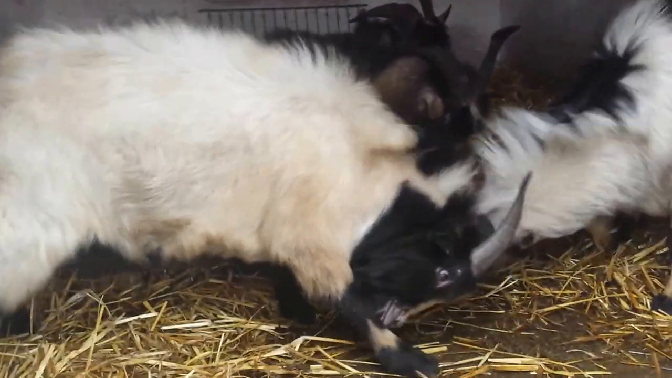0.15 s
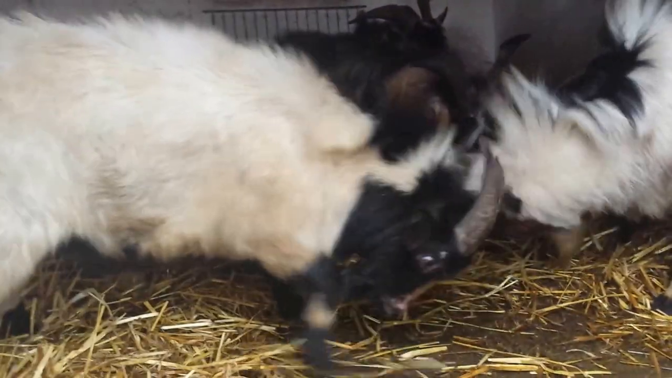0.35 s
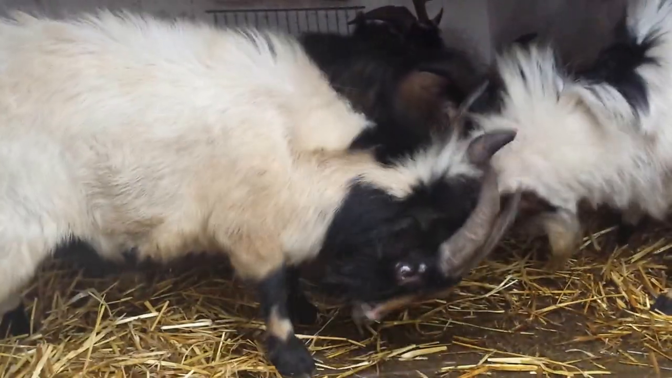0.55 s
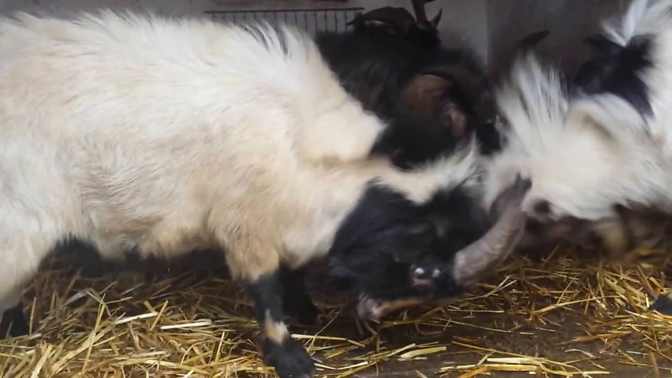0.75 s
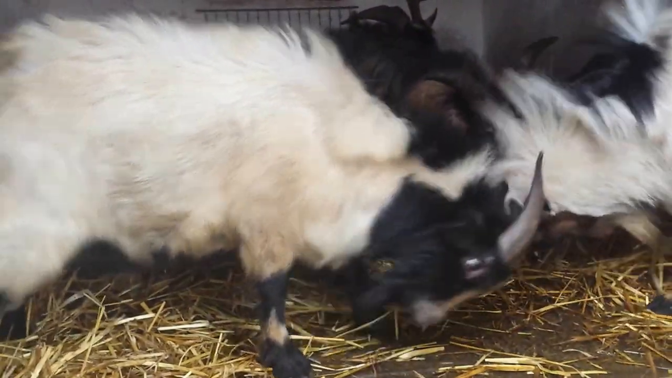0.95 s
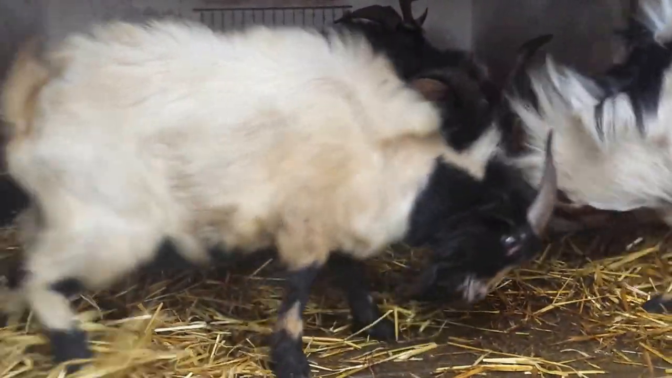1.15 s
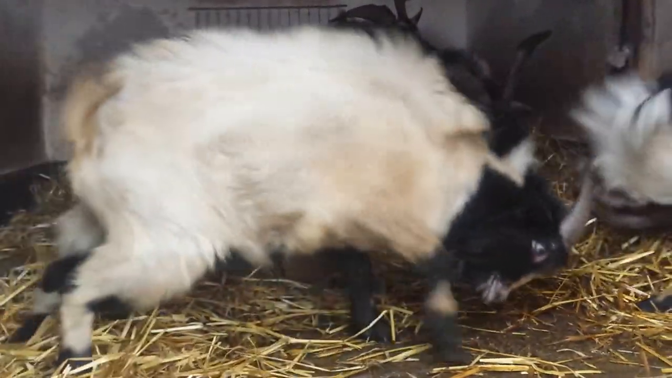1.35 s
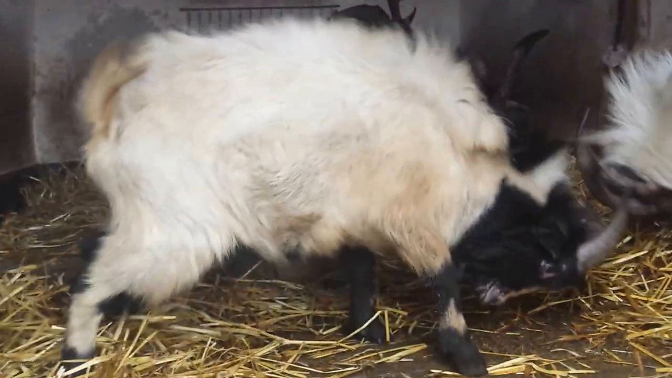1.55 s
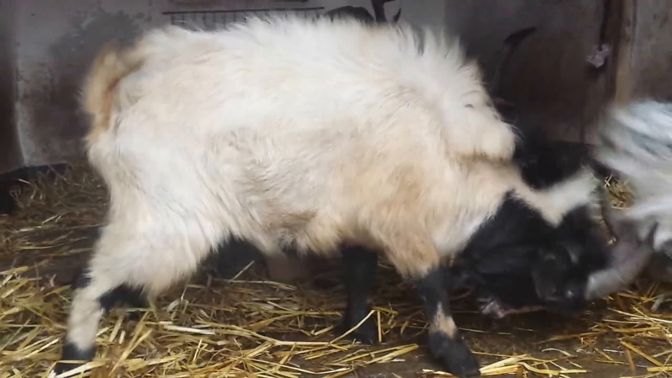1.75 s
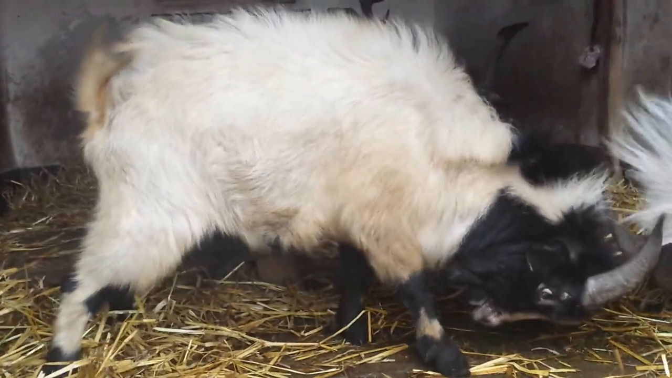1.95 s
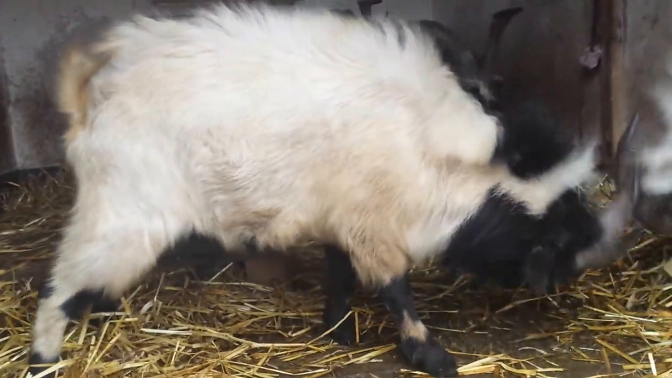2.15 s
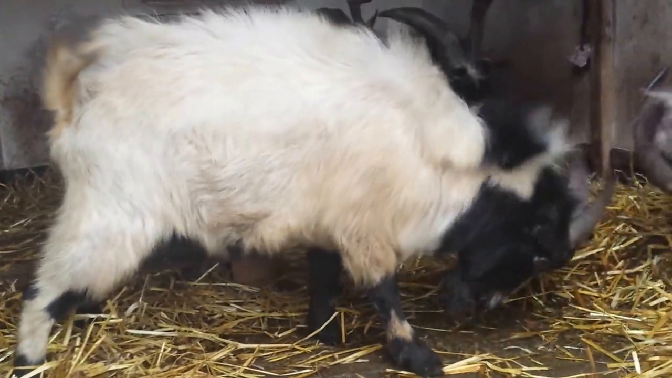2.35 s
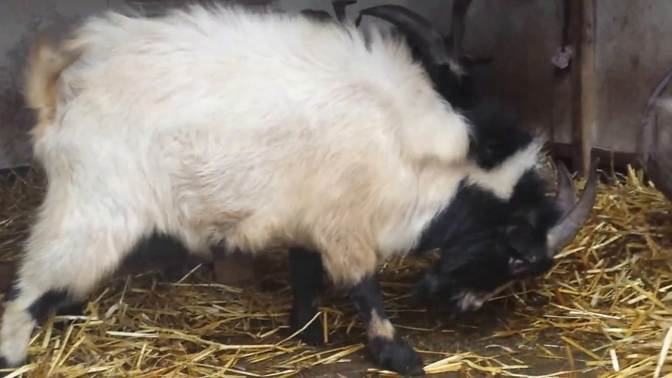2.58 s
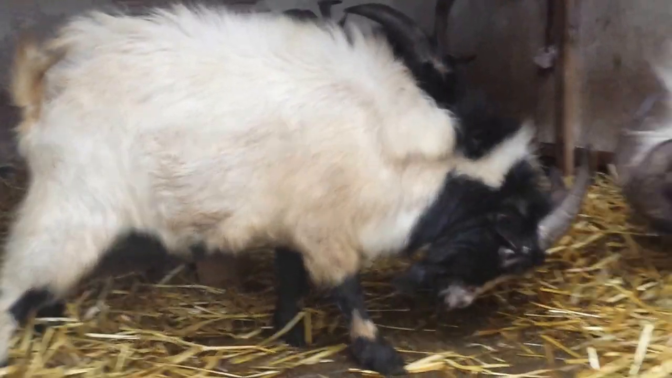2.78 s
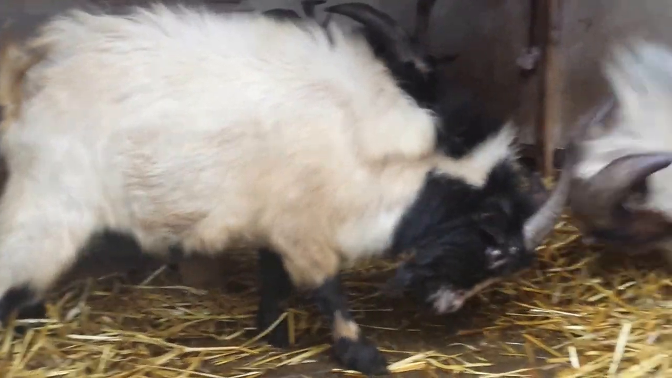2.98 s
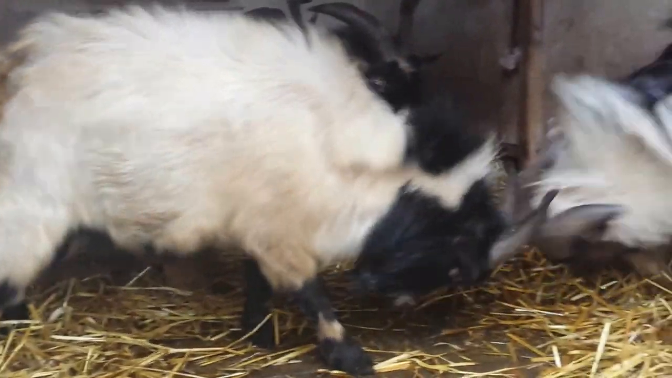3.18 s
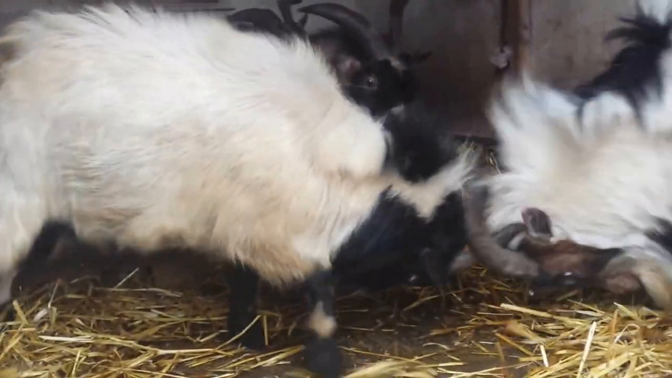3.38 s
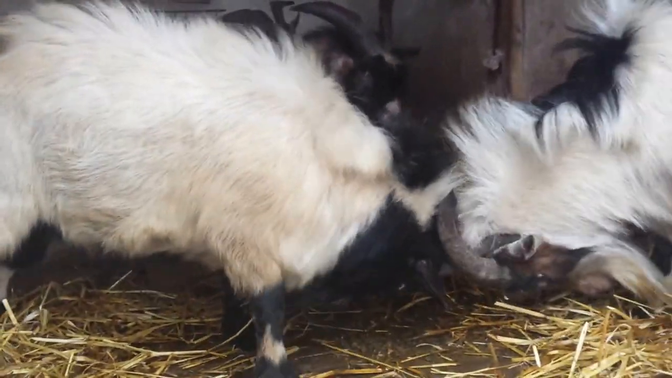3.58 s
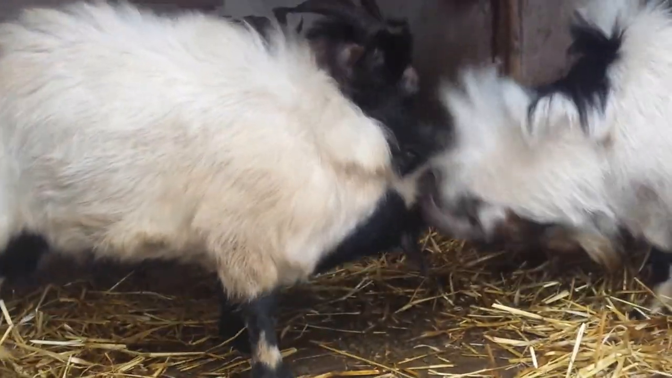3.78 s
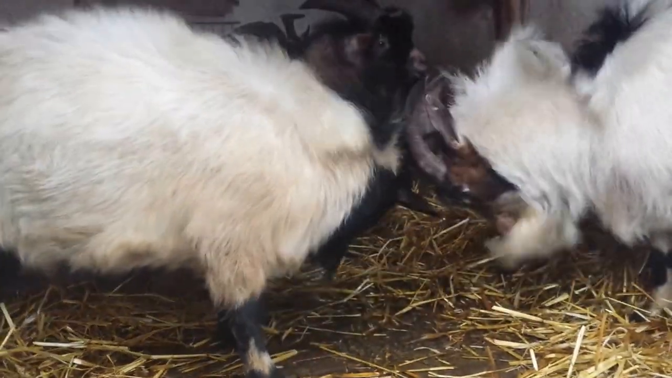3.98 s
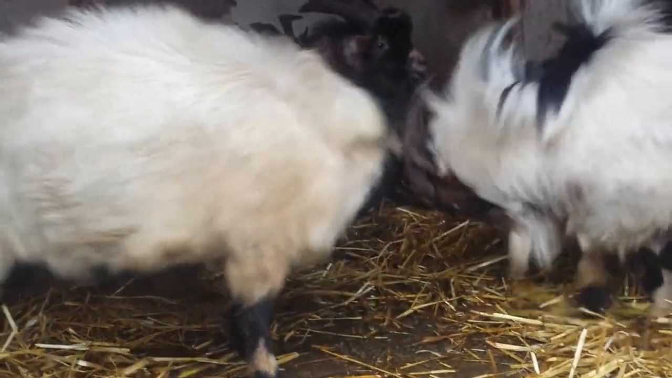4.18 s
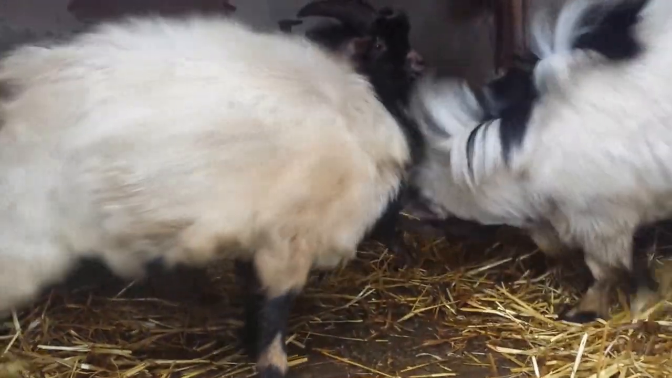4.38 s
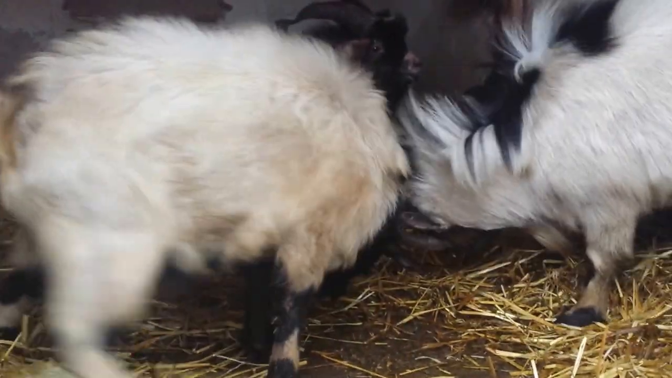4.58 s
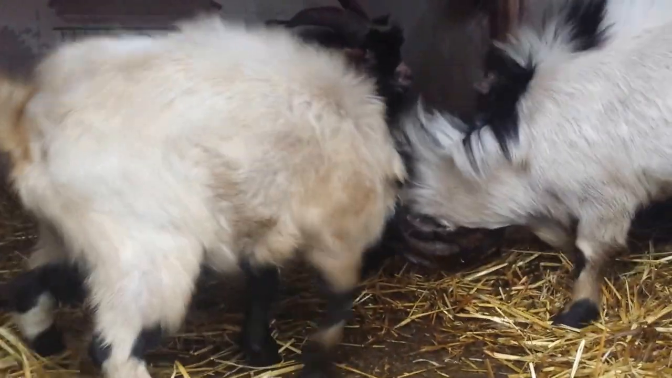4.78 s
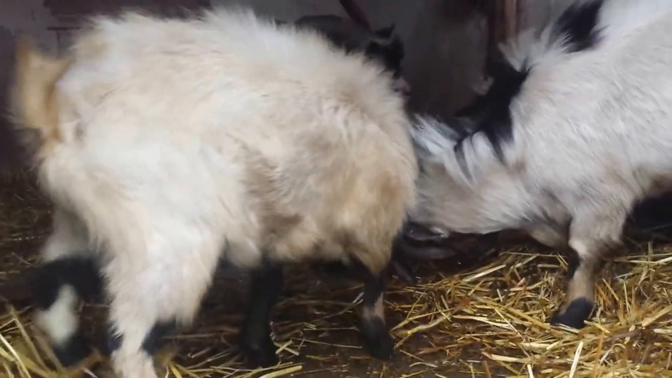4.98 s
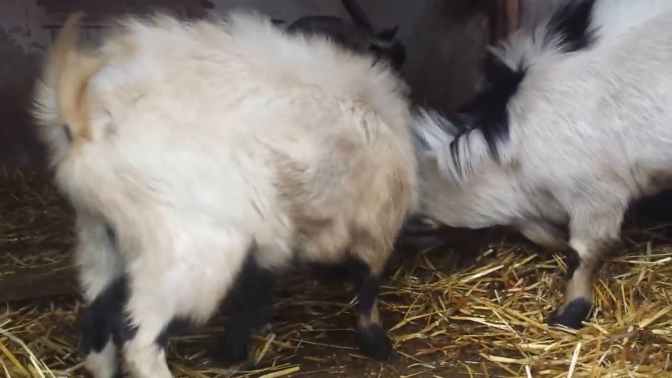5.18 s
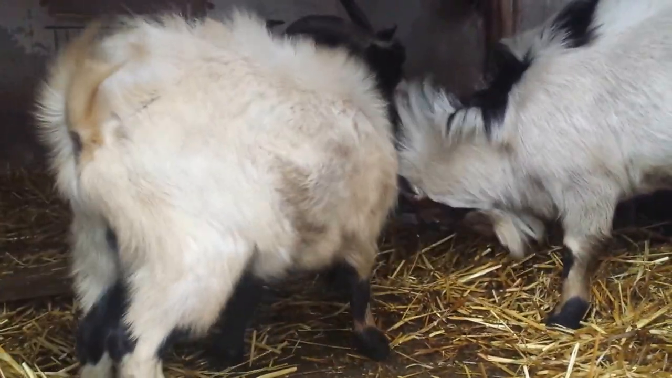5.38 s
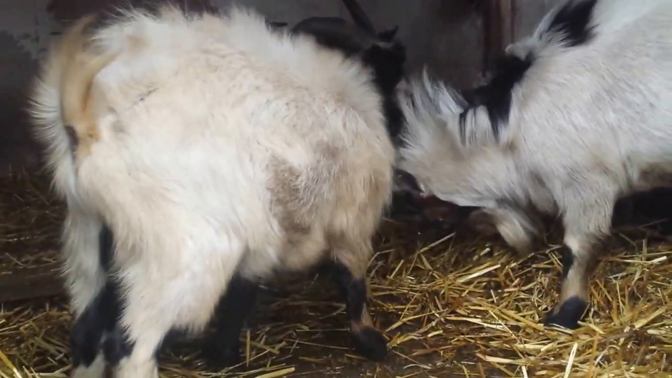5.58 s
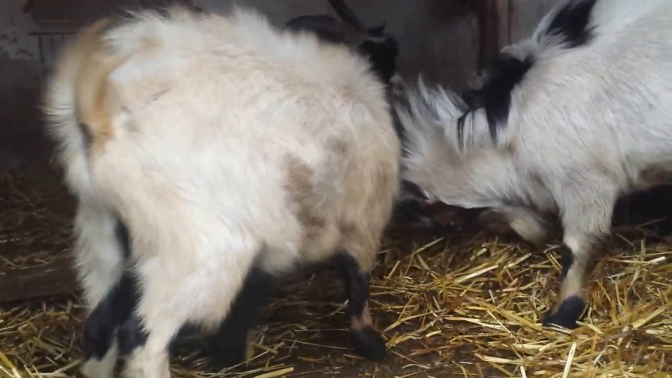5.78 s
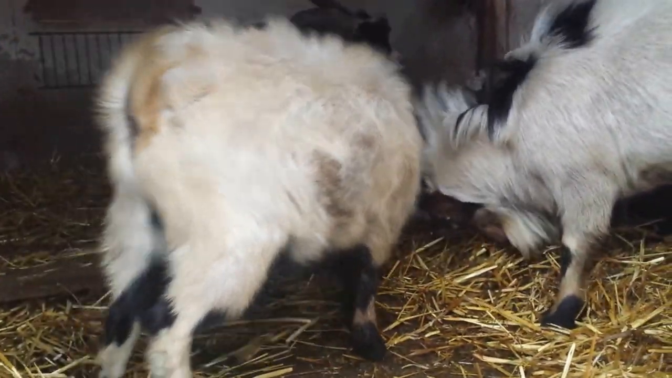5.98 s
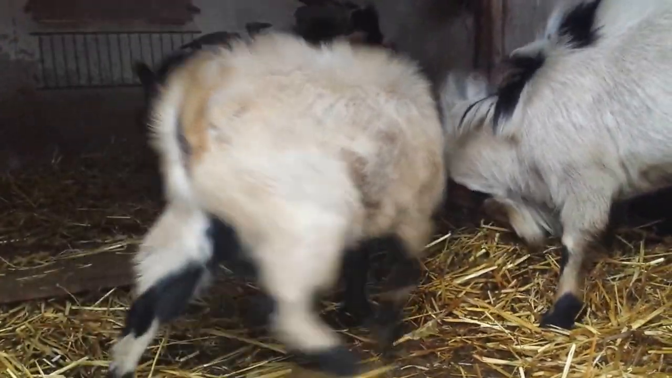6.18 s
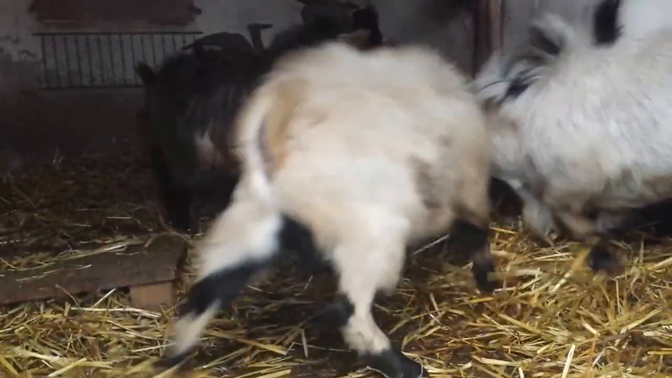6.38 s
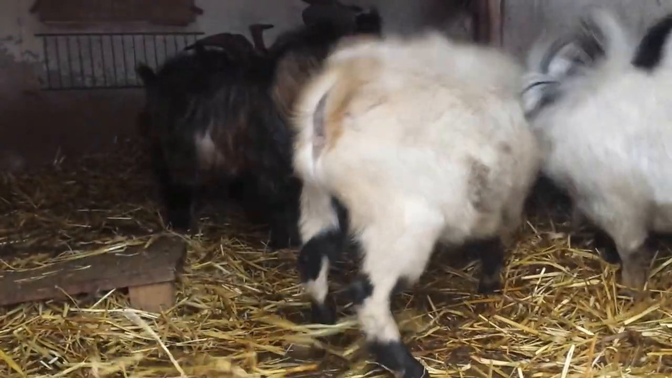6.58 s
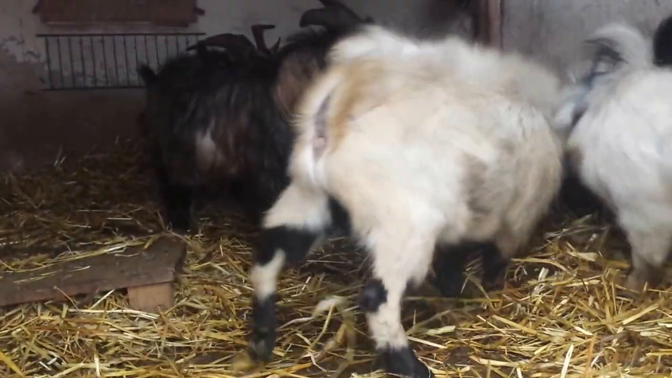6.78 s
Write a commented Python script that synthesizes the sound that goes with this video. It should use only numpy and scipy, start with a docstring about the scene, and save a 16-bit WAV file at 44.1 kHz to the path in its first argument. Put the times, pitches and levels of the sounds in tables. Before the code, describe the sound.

Two goats clack horns and shove in a straw-bedded wooden stall, straw rustling and crunching, hooves thudding dully on the floor.

```python
"""Two goats shoving in a straw-bedded stall

The straw is clumped random slips and ringing ticks, swelling with each stroke of the legs; stalks snap as clicks.
Hooves and flanks excite the damped modes of floor and boards; horn blows ring a hard wall and a hollow core.
Low rumble and still air lie beneath, puffs of air flutter at the microphones, and decaying noise is the stall's
reverberation. Two microphone ports, each with its own treble resonance, hear it all.
"""
import sys
import numpy as np
from scipy import signal
from scipy.fft import rfft, irfft
from scipy.io import wavfile
from scipy.ndimage import uniform_filter1d

SR = 44100
rng = np.random.default_rng(int(sys.argv[2]) if len(sys.argv) > 2 else 0)


def file_out(sig):
    """Save sig as 16-bit WAV at sys.argv[1]."""
    # one column per channel
    cols = np.atleast_2d(sig).T
    # limit, then scale
    lim = np.clip(cols, -1, 1)
    pcm = np.round(lim * 32767).astype(np.int16)
    wavfile.write(sys.argv[1], SR, pcm)


N = 302085

# Spectra of the sources. Each row: frequency in Hz, spectral level in dB per Hz.
LOOSE_STALKS_SPECTRUM = [(500, -28), (1500, -10.5), (2500, -5), (3500, -3.5), (5000, -4), (7000, -3.5),
                         (10000, -3), (14500, -7)]
TRODDEN_BEDDING_SPECTRUM = [(100, -10.5), (250, 0.5), (550, -1), (900, 1), (1400, -2), (2300, -4),
                            (3500, -6.5), (7000, -12)]
RUMBLE_SPECTRUM = [(15, -22.5), (35, -9), (60, 3), (110, -2), (200, -7.5), (350, -17.5), (700, -25),
                   (2000, -68)]
STILL_AIR_SPECTRUM = [(30, -11), (150, -0.5), (500, -4), (1000, -8.5), (2500, -34.5), (14000, -35)]
HORN_CRACK_SPECTRUM = [(300, -4), (800, 7), (1500, 2.5), (3200, 12), (6000, 6.5), (9000, 3.5), (14000, -18)]
STALK_CLICK_SPECTRUM = [(300, -12), (1500, -7), (2600, 2.5), (3600, 3.5), (4600, 3), (6000, -2.5),
                        (10000, 3), (14000, -14)]
# Horn against horn. Each row: time in s, level of the hard wall's ring in dB, its frequency in Hz,
# level of the hollow core's ring in dB, its frequency in Hz, level of the crack in dB, reverberation in dB.
HORN_BLOWS = [(0.0638, -19, 1930, -13, 1040, -17.5, -15.5), (.0705, -36, 1650, -30, 740, -23, 2),
              (.3725, -39, 2560, -51, 690, -35, -1.5), (.426, -38.5, 1770, -46, 750, -48, 2),
              (.7757, -11.5, 2040, -30, 776, -18, -5.5), (0.9792, -24, 2040, -26, 835, -17.5, -13),
              (1.1468, -31, 2000, -34.5, 725, -40, -3), (1.2293, -24, 2160, -46, 940, -20.5, -6),
              (1.6181, -24, 2410, -29.5, 1090, -23, -6), (1.6895, -22.5, 2420, -27, 850, -23, -6.5),
              (1.731, -30, 2140, -37, 904, -22.5, -9), (1.7506, -19, 1930, -32, 875, -22, -10),
              (1.8694, -32, 1830, -32, 980, -39, -4.5), (2.0079, -23, 2160, -22, 820, -29, -2.5),
              (3.055, -44, 1545, -41.5, 790, -47.5, 2), (3.3212, -31, 1700, -29.5, 750, -35, -7),
              (3.4635, -31.5, 1980, -27.5, 870, -35, -10.5), (3.8344, -30, 1570, -39.5, 720, -29.5, -2.5),
              (3.904, -34.5, 1710, -36, 775, -63, -0.5), (3.912, -27, 1770, -30, 790, -57, -8.5),
              (4.7004, -40, 2420, -41, 780, -21, -7), (6.3953, -27, 2280, -21, 800, -41, -24),
              (6.5488, -27.5, 1650, -24, 925, -43, -8), (6.6114, -33, 1860, -20.5, 715, -37, -15)]
# Hooves and flanks on boards. Each row: start in s, level in dB, favoured frequency in Hz, contact time in s.
BOARD_KNOCKS = [(0.0648, -23.5, 748, 0.0076), (0.977, -17.5, 448, 0.0044), (1.002, -28, 676, 0.013),
                (1.147, -28.5, 800, 0.0083), (1.23, -36, 495, 0.0075), (1.52, -26, 506, 0.016),
                (1.617, -32, 510, 0.01), (1.728, -19.5, 301, 0.027), (1.867, -32, 511, 0.014),
                (2.006, -21.5, 304, 0.005), (2.023, -29.5, 726, 0.0058), (2.243, -44, 312, 0.014),
                (3.834, -35.5, 450, 0.013), (3.912, -32.5, 830, 0.0069), (5.174, -33, 715, 0.029),
                (5.204, -36, 301, 0.0053), (5.289, -37.5, 384, 0.017), (6.184, -50, 330, 0.01),
                (6.374, -21, 370, 0.022), (6.399, -14.5, 490, 0.0056), (6.415, -31, 510, 0.0091),
                (6.548, -24, 360, 0.042), (6.611, -24, 660, 0.012), (6.641, -37, 610, 0.009)]
# Weight landing on the bedded floor. Each row: start in s, level in dB, favoured frequency in Hz,
# time constant of the softened onset in s.
FLOOR_LANDINGS = [(.001, -32, 103, 0.0015), (.096, -32, 164, 0.0012), (0.46, -36.5, 104, 0.002),
                  (0.703, -29.5, 128, 0.0051), (0.741, -33, 98, 0.0049), (0.794, -28.5, 125, 0.0046),
                  (0.835, -32, 135, 0.0016), (0.974, -23.5, 130, 0.0026), (1.003, -22.5, 107, .0026),
                  (1.043, -39, 103, .004), (1.127, -33.5, 114, 0.0045), (1.228, -38.5, 138, 0.004),
                  (1.454, -37.5, 282, 0.0022), (1.708, -20.5, 239, 0.016), (1.725, -19.5, 156, 0.013),
                  (1.884, -37.5, 114, 0.0073), (2.012, -24.5, 129, 0.0065), (2.098, -36.5, 170, 0.014),
                  (2.235, -41.5, 248, 0.0056), (2.344, -39, 236, 0.001), (3.048, -42, 200, 0.0027),
                  (3.548, -39, 168, 0.0022), (3.825, -33.5, 110, 0.02), (4.197, -39, 95, 0.0017),
                  (4.306, -35.5, 121, 0.00067), (5.221, -41.5, 80, 0.0086), (6.373, -21.5, 258, 0.012),
                  (6.396, -20, 160, 0.011), (6.444, -26.5, 174, 0.0044), (6.55, -20, 209, 0.0086),
                  (6.616, -23.5, 157, 0.0017)]
# Modes of the boards and of the floor. Each row: frequency in Hz, level in dB, 60 dB decay time in s.
BOARD_MODES = [(250, 5.5, 0.049), (319, -4.5, 0.042), (361.5, 3, 0.054), (445, -3, 0.049), (519, 4.5, 0.08),
               (610, 8, 0.018), (708, 1, 0.045), (767, -5, 0.1), (884, -2.5, 0.11), (1245, 4, 0.082)]
FLOOR_MODES = [(65, -16, 0.23), (118.6, -0.5, 0.06), (135.4, -10.5, 0.1), (158.9, 0, 0.12),
               (182, 3.5, 0.076), (216, 2.5, 0.11), (263, 3, 0.06)]
# Single stalks breaking. Each row: start in s, level in dB, own pitch in Hz, left over right in dB.
STALK_SNAPS = [(.634, -13.5, 5600, -1.5), (0.9078, -20, 10100, -6), (1.099, -25.5, 7370, -2),
               (1.3528, -30, 7800, -20), (1.512, -21, 6440, -13), (1.9443, -18.5, 6140, 31),
               (3.0899, -28.5, 5730, -2), (3.24, -31, 8150, 0), (3.4296, -37, 6100, 10),
               (3.447, -35, 5670, 0), (3.4995, -34, 3780, 18), (3.778, -25.5, 6200, -11),
               (3.8205, -21.5, 6340, 1), (3.9802, -34, 5930, 1), (4.005, -41, 6230, 15),
               (4.0454, -27, 4340, 7), (4.2868, -29, 8000, -2), (4.362, -17, 5700, 1),
               (4.76, -23, 6960, -5), (4.792, -24.5, 5670, 4), (5.0773, -33, 5950, 1),
               (5.6165, -39, 10500, -8), (5.795, -33, 6400, 3), (6.3941, -16, 8700, -25)]
# Air stirred by passing bodies. Each row: start in s, level in dB, frequency in Hz, left over right in dB.
AIR_PUFFS = [(4.789, -41, 62.3, -14), (5.453, -32, 90.5, 23), (5.813, -38, 136, -25),
             (5.971, -24.5, 80, 30), (6.019, -26.5, 90, 10), (6.059, -30.5, 79, 27), (6.156, -20, 127, -32),
             (6.181, -17.5, 136, -41), (6.213, -23, 93, -18), (6.287, -23, 85, -14), (6.34, -21.5, 80, 27),
             (6.68, -29, 73, 33)]
# A leg dragged through the straw. Each row: start in s, length in s, swish of loose stalks in dB,
# crunch of trodden bedding in dB, left over right in dB (swish only).
LEG_STROKES = [(-.15, 0.14, -31.5, -37, 1.5), (0.02, 0.43, -41, -45.5, 1.5), (0.425, 0.46, -44, -47.5, 1.5),
               (0.543, 0.17, -36, -53, 2.5), (0.723, 0.19, -30, -40, 1), (0.94, 0.27, -35, -39, 1.2),
               (1.228, 0.21, -37, -46.5, 1.5), (1.37, 0.19, -32.5, -42.5, 0),
               (1.501, 0.46, -37.5, -40.5, -1.2), (1.95, .17, -37, -38, -0.5),
               (2.113, 0.14, -57, -36.5, -2), (2.174, 0.17, -39.5, -46, 0.5), (3.03, 0.12, -44.5, -52, 0.5),
               (3.138, 0.2, -37, -46, 0.5), (3.27, 0.27, -51, -47.4, 0), (3.568, 0.083, -33, -39.5, -2.5),
               (3.653, .17, -37.5, -43.5, 0), (3.953, 0.15, -48.5, -51, -3), (4.076, 0.15, -36, -41, 0),
               (4.295, 0.18, -38, -46.5, 3), (4.389, 0.46, -34, -43.5, .4), (4.776, 0.395, -42, -48, 1.5),
               (5.086, 0.1, -47, -41.5, 8), (5.245, 0.28, -56, -57.5, -0.5), (5.45, .35, -43, -50.5, -2.5),
               (5.78, 0.15, -44.5, -47.5, -1.5), (5.896, 0.21, -47, -45.5, -.5),
               (6.015, 0.16, -37, -49, -2), (6.127, 0.15, -40.5, -45.5, 1), (6.245, .16, -33.5, -40, -1.5),
               (6.33, 0.29, -37, -42.5, .4), (6.635, 0.33, -37, -45.5, 0.5)]
# Rumble at full effort, as the big goat backs towards the microphone. Each row: time in s, level in dB.
RUMBLE_COURSE = [(0, -48), (1.3, -45), (2.7, -49), (3.4, -47), (4.7, -48), (5.3, -43), (6.25, -41.5),
                 (6.85, -46.5)]
# Reverberation of the stall. Each row: frequency in Hz, 60 dB decay time in s.
STALL_DECAY = [(100, 0.31), (300, 0.15), (1000, 0.2), (2500, 0.18), (6000, 0.13), (14000, 0.032)]
# First echoes off the floor and the nearest wall. Each row: delay in s, level in dB.
FIRST_ECHOES = [(.0017, -13), (.0064, -14.5)]
# Likeness of the two ports in a diffuse field. Each row: frequency in Hz, left-right correlation (1 = equal).
PORT_LIKENESS = [(30, 0.59), (70, 0.86), (130, 0.93), (500, 0.73), (1000, 0.41), (2000, 0.15),
                 (14000, 0.35)]
# Responses of the microphone ports. Each row: frequency in Hz, gain in dB.
LEFT_PORT_RESPONSE = [(200, -0.5), (1000, -4), (2400, -1), (3500, -2), (4800, 3.5), (5800, 10.5),
                      (6800, 5.5), (8500, -4.5), (14500, -5)]
RIGHT_PORT_RESPONSE = [(200, -0.5), (1000, -2.5), (2400, 2), (3500, 0), (5000, -1), (6500, 3), (8200, 6.5),
                       (10500, 0.5), (14500, 1)]

TIME = np.arange(N) / SR
BLOW = np.arange(SR // 3) / SR  # time axis of one short event, s
STEPS = np.arange(0, N + 64, 64) / SR  # coarse time axis of the envelopes, s
AIR_DB, EDGE_HZ = -57.5, 14600
# A leg gathers speed; the stalks settle once it stops.
SWING_S, SETTLE_DB_PER_S = 0.14, 140
# The bedding under goats that stand still.
REST_SWISH_DB, REST_CRUNCH_DB = -66, -61
# Legs catch on stalks and slip free: rms size of the swish's surges and the window that smooths them.
CATCH_DB, CATCH_S = 1.1, 0.052
# Bedding crushed by a landing, then the floor trembling on; both levels are relative to the thud.
CRUSH_DB, CRUSH_ATTACK_S, CRUSH_HOLD_S, CRUSH_DB_PER_S = -14.5, .012, 0.0083, 186
SHAKE_DB, SHAKE_ATTACK_S, SHAKE_HOLD_S, SHAKE_DB_PER_S = -18, .02, 0.072, 113
# Share of the legs' swing in dB that the rumble follows.
SWAY_FOLLOW = 0.28
# Horns grind for GRIND_S when the wall rings at FIRM_DB; harder blows are shorter.
GRIND_S, FIRM_DB, GRIND_FOLLOW = .0025, -26.5, 0.11


def amp(db):
    """Decibel definition: converts a level to an amplitude gain."""
    return 10 ** (np.asarray(db) / 20)


def unit(x):
    """Power normalisation: scales to rms 1."""
    return x / np.sqrt(np.mean(x ** 2) + 1e-20)


def crest(x, size):
    """Short-time power: scales so that the loudest stretch of size samples has rms 1."""
    loudest = uniform_filter1d(x ** 2, size, mode="constant").max()
    return x / np.sqrt(loudest + 1e-20)


def read(points, hz):
    """Logarithmic pitch scale: interpolates a table along log frequency."""
    f, value = np.transpose(points)
    return np.interp(np.log(hz + 1), np.log(f + 1), value)


def colour(x, points):
    """Minimum phase: filters causally, the phase following from the log gain by a Hilbert transform."""
    log_gain = np.log(amp(read(points, abs(np.fft.fftfreq(4096, 1 / SR)))))
    response = np.exp(np.conj(signal.hilbert(log_gain)))
    taps = np.fft.ifft(response).real[:2048]
    taps = taps.reshape((1,) * (x.ndim - 1) + (-1,))
    return signal.oaconvolve(x, taps, axes=-1)[..., :x.shape[-1]]


def pair(x):
    """Diffuse-field coherence: blends two unrelated signals so that close ports agree most in the bass."""
    a, b = rfft(x)
    same = np.clip(read(PORT_LIKENESS, np.fft.rfftfreq(x.shape[1], 1 / SR)), -1, 1)
    right = same * a + np.sqrt(1 - same ** 2) * b
    return irfft(np.array([a, right]), x.shape[1])


def panned(pan_db):
    """Constant-power panning: left and right gains for a level difference."""
    gains = amp(np.array([pan_db, -pan_db]) / 2).reshape(2, -1)
    return gains / np.sqrt((gains ** 2).mean(0))


def ports(sound, pan_db=0., count=0):
    """Interaural-style differences: one sound at two ports, reaching the right one count samples later."""
    delayed = np.pad(sound, (count, 0))[:len(sound)]
    return panned(pan_db) * np.array([sound, delayed])


def add(mix, s, sound):
    """Superposition: adds a two-channel sound to the mix at time s."""
    part = mix[:, max(round(s * SR), 0):][:, :sound.shape[1]]
    part += sound[:, :part.shape[1]]


def ring(hz, t60):
    """Exponential decay: one mode that falls by 60 dB in t60 seconds."""
    return np.cos(2 * np.pi * hz * BLOW) * np.exp(-np.log(1000) * BLOW / max(t60, 1e-4))


def damped(x, hz, width):
    """Heavily damped resonance: a band-pass whose width is a share of its frequency."""
    edges = np.clip([hz / (1 + width / 2), hz * (1 + width / 2)], 20, .49 * SR)
    return signal.sosfilt(signal.butter(2, edges, "bandpass", fs=SR, output="sos"), x)


def modal(table, hz, focus_db):
    """Modal excitation: a struck panel's modes, weakened by focus_db per octave away from hz."""
    modes = 0
    for f, level, t60 in table:
        away = abs(np.log2(f / hz))
        modes = modes + amp(level - focus_db * away) * ring(f, t60)
    return modes


def contact(length, grind):
    """Contact force: an impulsive push plus decaying noise as the two surfaces grind."""
    grit = rng.standard_normal(len(BLOW)) * np.exp(-BLOW / max(length, 1e-4))
    return signal.unit_impulse(len(BLOW)) + grind * grit / np.linalg.norm(grit)


def stall(x, wet_db):
    """Reverberation: two early echoes and a fresh noise tail, each band dying at its own speed."""
    hz, t, z = signal.stft(rng.standard_normal((2, 12288)), SR, nperseg=256)
    decay = np.exp(-np.log(1000) * t / read(STALL_DECAY, hz)[:, None])
    tail = signal.istft(z * decay, SR, nperseg=256)[1]
    # the dense reflections fade in between 3 and 9.7 ms
    onset = np.clip((np.arange(tail.shape[1]) / SR - .003) / 0.0067, 0, 1)
    tail = pair(tail * onset)
    tail *= amp(wet_db) / np.linalg.norm(tail[0])
    for delay, db in FIRST_ECHOES:
        add(tail, delay, ports(amp(db) * signal.unit_impulse(32), count=14))
    return x + signal.fftconvolve(x, tail, axes=1)[:, :x.shape[1]]


def swell(start, hold, attack, fall_db_per_s):
    """Rise and decay: a smooth rise, held until hold seconds after the start, then a steady fall in dB."""
    age = STEPS - start
    rise = np.sin(np.pi / 2 * np.clip(age / attack, 0, 1)) ** 2
    return rise * amp(-fall_db_per_s * np.clip(age - hold, 0, 2))


def landings(attack, hold, fall_db_per_s):
    """Energy transfer: power of what the landings set going, in proportion to each thud's power."""
    return sum((amp(db) * swell(s, hold, attack, fall_db_per_s)) ** 2 for s, db, _, _ in FLOOR_LANDINGS)


def legwork():
    """Incoherent summation: powers of the swish at each port and of the crunch add over all leg strokes."""
    swish, crunch = amp(REST_SWISH_DB) ** 2, amp(REST_CRUNCH_DB) ** 2
    for start, length, swish_db, crunch_db, pan_db in LEG_STROKES:
        speed = swell(start, length, SWING_S, SETTLE_DB_PER_S)
        swish = swish + (amp(swish_db) * panned(pan_db) * speed) ** 2
        crunch = crunch + (amp(crunch_db) * speed) ** 2
    return swish, crunch


def envelope(power):
    """Amplitude as the root of power: interpolates a slow power to a gain for every sample."""
    return np.array([np.interp(TIME, STEPS, np.sqrt(p)) for p in np.atleast_2d(power)])


def background(swishing):
    """Filtered noise: bodies rumble with the legs' effort and after landings, over the barn's still air."""
    effort = swishing.mean(0) / swishing.mean(0).max()
    sway = amp(np.interp(STEPS, *np.transpose(RUMBLE_COURSE))) ** 2 * effort ** SWAY_FOLLOW
    shake = amp(SHAKE_DB) ** 2 * landings(SHAKE_ATTACK_S, SHAKE_HOLD_S, SHAKE_DB_PER_S)
    rumble = unit(colour(pair(rng.standard_normal((2, N))), RUMBLE_SPECTRUM))
    air = unit(colour(pair(rng.standard_normal((2, N))), STILL_AIR_SPECTRUM))
    return rumble * envelope(sway + shake) + amp(AIR_DB) * air


def puffs():
    """Local pressure of eddies: brief low flutter on the ports that does not excite the room."""
    out = np.zeros((2, N))
    for s, db, hz, pan_db in AIR_PUFFS:
        age = BLOW / 0.014  # the gust's envelope peaks after 14 ms
        eddy = damped(rng.standard_normal(len(BLOW)), hz, width=0.93) * age ** 2 * np.exp(-2 * age)
        add(out, s, ports(amp(db) * crest(eddy, size=352), pan_db))
    return out


def crackle(per_s, spread_db, clump_db, diffuse_db):
    """Stick-slip friction: many uneven slips in clumps, each from its own side, over a diffuse wash."""
    chance, size, side = rng.random(N), rng.exponential(1, N), rng.uniform(-1, 1, N)
    clumps = unit(signal.oaconvolve(rng.standard_normal(N), np.hanning(SR // 60), "same"))
    level_db = spread_db * np.minimum(size, 4) + clump_db * clumps
    slips = (chance < per_s / SR) * rng.choice([-1, 1], N) * amp(level_db)
    # slips on the left are stronger there and reach the right up to 16 samples later; the reverse on the right
    late = np.clip(np.arange(N) + np.round(16 * side).astype(int), 0, N - 1)
    left = slips * (1 + side / 2)
    right = np.bincount(late, slips * (1 - side / 2), N)
    return unit(np.array([left, right])) + amp(diffuse_db) * pair(rng.standard_normal((2, N)))


def ticks(per_s, spread_db):
    """Free vibration: stalks flick loose one by one, each ringing briefly at its own pitch."""
    out = np.zeros((2, N))
    for when, pitch, size, side in rng.random((int(per_s * N / SR), 4)):
        age, hz = BLOW[:300], 3600 * (14000 / 3600) ** pitch
        tick = np.sin(2 * np.pi * hz * age) * np.exp(-hz * age / 4.5)
        add(out, when * N / SR, ports(amp(spread_db * size ** 3) * tick, 12 * (side - .5), count=5))
    return unit(out)


def straw(swishing, treading):
    """Friction noise: loose stalks swish and tick in uneven surges while packed bedding crunches below."""
    slips = crackle(per_s=5000, spread_db=3.6, clump_db=1.7, diffuse_db=-6)
    swish = unit(colour(slips, LOOSE_STALKS_SPECTRUM))
    swish += amp(-7.5) * ticks(per_s=420, spread_db=13)
    packed = crackle(per_s=2500, spread_db=2.5, clump_db=0.0, diffuse_db=-7.5)
    crunch = unit(colour(packed, TRODDEN_BEDDING_SPECTRUM))
    crushing = amp(CRUSH_DB) ** 2 * landings(CRUSH_ATTACK_S, CRUSH_HOLD_S, CRUSH_DB_PER_S)
    window = np.hanning(max(round(CATCH_S / STEPS[1]), 3))
    surge = amp(CATCH_DB * unit(np.convolve(rng.standard_normal(len(STEPS)), window, "same")))
    return swish * envelope(swishing * surge ** 2) + crunch * envelope(treading + crushing)


def snaps():
    """Brittle fracture: a splintering stalk gives a broad click with a trace of its own pitch."""
    out = np.zeros((2, N))
    for s, db, hz, pan_db in STALK_SNAPS:
        click = colour(contact(length=.0009, grind=1.4), STALK_CLICK_SPECTRUM)
        snap = amp(db) * crest(click + 0.66 * damped(click, hz, width=0.47), size=44)
        add(out, s, stall(ports(snap, pan_db, count=7), wet_db=-13))
    return out


def thuds():
    """Modes of a softly struck floor: it booms briefly under a goat's weight, the bedding slowing the onset."""
    out = np.zeros((2, N))
    for s, db, hz, length in FLOOR_LANDINGS:
        boom = modal(FLOOR_MODES, hz, focus_db=24.5) * (1 - np.exp(-BLOW / max(length, 1e-4)))
        add(out, s, ports(amp(db) * crest(boom, size=352), count=8))
    return stall(out, wet_db=-7.5)


def boards():
    """Modes of a struck plate: every knock rings the same boards, its place deciding which modes speak most."""
    out = np.zeros((2, N))
    for s, db, hz, length in BOARD_KNOCKS:
        force = contact(length, grind=2.5)
        knock = signal.fftconvolve(force, modal(BOARD_MODES, hz, focus_db=11))[:len(BLOW)]
        add(out, s, stall(ports(amp(db) * crest(knock, size=176), count=14), wet_db=-7))
    return out


def horns():
    """Impact on a hollow body: a surface crack, with hard wall and hollow core ringing, damped by the skull."""
    out = np.zeros((2, N))
    for s, wall_db, wall_hz, core_db, core_hz, crack_db, room_db in HORN_BLOWS:
        length = GRIND_S * amp(GRIND_FOLLOW * (FIRM_DB - wall_db))
        push = contact(length, grind=.3)
        wall = amp(wall_db) * crest(damped(push, wall_hz, width=0.42), size=88)
        core = amp(core_db) * crest(damped(push, core_hz, width=0.37), size=88)
        crack = amp(crack_db) * crest(colour(contact(length, grind=5.8), HORN_CRACK_SPECTRUM), size=88)
        clack = wall - core + crack  # the two rings swing in opposite senses
        # the clack starts 0.36 ms after its tabled time
        add(out, s + 0.00036, stall(ports(clack, pan_db=0.0, count=4), room_db))
    return out


def scene():
    """Superposition: the sum of everything that sounds in the stall."""
    swishing, treading = legwork()
    bedding = straw(swishing, treading) + snaps()
    blows = horns() + boards() + thuds()
    return bedding + blows + puffs() + background(swishing)


def record(dry):
    """Port resonance and limited range: each port colours its sound, then full scale and bandwidth limit it."""
    heard = np.array([colour(dry[0], LEFT_PORT_RESPONSE), colour(dry[1], RIGHT_PORT_RESPONSE)])
    heard = np.clip(heard, -1, 1)
    lowpass = signal.firwin(401, EDGE_HZ, window=("kaiser", 8), fs=SR)
    return signal.oaconvolve(heard, lowpass[None], "same")


dry = scene()
out = record(dry)
file_out(out)
```